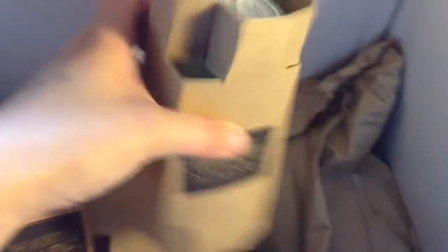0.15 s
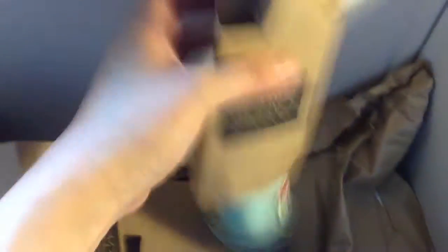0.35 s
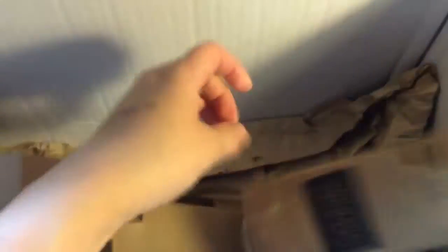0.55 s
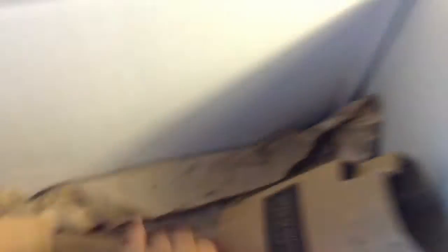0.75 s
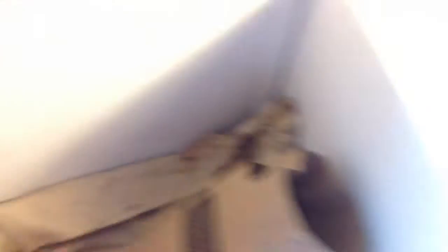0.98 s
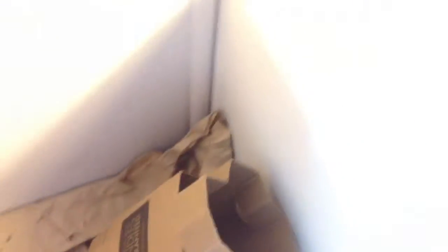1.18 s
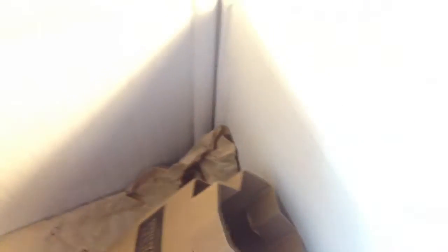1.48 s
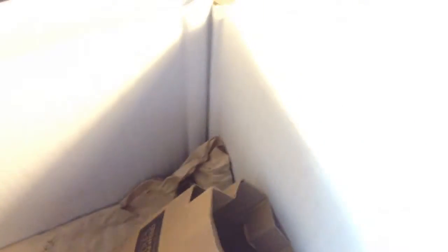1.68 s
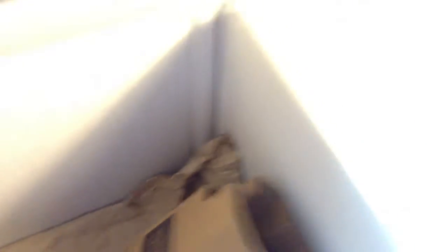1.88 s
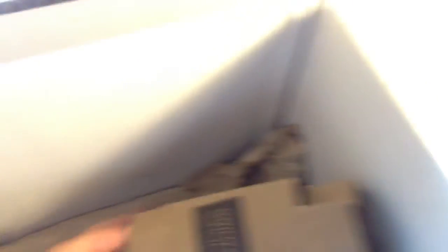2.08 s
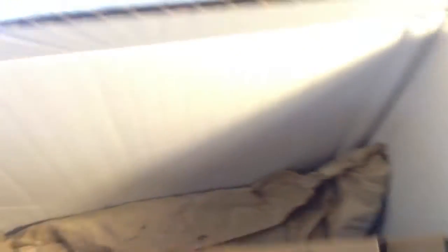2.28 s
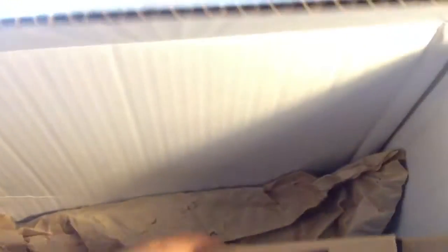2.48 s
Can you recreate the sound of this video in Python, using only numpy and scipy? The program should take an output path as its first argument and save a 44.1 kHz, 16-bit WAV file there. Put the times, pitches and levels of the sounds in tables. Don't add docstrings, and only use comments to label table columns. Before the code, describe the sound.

Paper crinkling up close inside an open cardboard box: cardboard sleeves clatter hard at first, then softer scrapes, small taps and wall thumps continue over faint hiss in a quiet room.

```python
import sys
import numpy as np
from scipy import signal
from scipy.fft import rfft, irfft, next_fast_len
from scipy.io import wavfile
from scipy.ndimage import uniform_filter1d, map_coordinates

SR = 44100
rng = np.random.default_rng(int(sys.argv[2]) if len(sys.argv) > 2 else 0)


def master_out(mix):
    frames = np.transpose(np.atleast_2d(mix))
    ceiling = np.clip(frames, -1, 1)
    pcm = np.round(ceiling * 32767).astype(np.int16)
    wavfile.write(sys.argv[1], SR, pcm)


def gain_from_db(level_db):
    decades = np.asarray(level_db, float) / 20
    return 10 ** decades


N = 116865


def unit(x):
    return x / np.sqrt(np.mean(x ** 2) + 1e-20)


def wobble(rate_hz):
    knots = rng.standard_normal(int(N * 400 / SR) + 4)
    return map_coordinates(knots, [np.arange(N) * rate_hz / SR])


def coloured(x, points):
    size = next_fast_len(len(x) + 8192)
    point_hz, point_db = np.transpose(points)
    bin_hz = np.fft.rfftfreq(size, 1 / SR)
    gain = gain_from_db(np.interp(np.log(bin_hz + 1), np.log(point_hz + 1), point_db))
    return irfft(rfft(x, size) * gain, size)[:len(x)]


def patchy(x, patchy_db):
    spectrum = signal.stft(x, nperseg=256)[2]
    field = rng.standard_normal(spectrum.shape)
    field = uniform_filter1d(field, 12, axis=0)
    field = uniform_filter1d(field, 12, axis=1)
    return signal.istft(spectrum * gain_from_db(patchy_db * unit(field)), nperseg=256)[1][:N]


def grains(per_s, spread_db):
    chance, size = rng.random((2, N))
    level = gain_from_db(-spread_db * np.log(size + 0.04))
    return (chance < per_s / SR) * level * rng.choice([-1, 1], N)


def add(track, start_s, sound):
    at = round(start_s * SR)
    track[at:at + len(sound)] += sound[:N - at]


def ring(hz, db, t60, attack_s, t, bend=1):
    hz = hz * np.exp(0.015 * rng.standard_normal(len(hz)))
    db = db + 1.2 * rng.standard_normal(len(hz))
    decay = gain_from_db(db[:, None] - 60 * (t / t60[:, None]) ** bend)
    modes = decay * np.sin(2 * np.pi * hz[:, None] * t)
    return (1 - np.exp(-t / attack_s)) * modes.sum(0)


def strokes(column, extra_db=0):
    # start_s, length_s, slide_db, crumple_db
    stroke_rows = [(-.03, .12, -43.5, -78), (0.133, 0.059, -45, -73), (0.212, 0.12, -29.5, -37.5),
                   (0.229, 0.1, -28.5, -33), (0.325, 0.042, -28, -21.5), (0.346, 0.12, -37, -24.5),
                   (0.455, 0.078, -35.5, -24), (0.526, 0.11, -31.5, -28), (0.689, 0.095, -31.5, -32),
                   (0.855, 0.077, -40, -42.5), (0.923, 0.14, -38.5, -40.5), (1.033, 0.14, -42.5, -48),
                   (1.179, 0.2, -32.5, -44), (1.315, 0.15, -30, -42.5), (1.507, 0.051, -38.5, -31),
                   (1.581, 0.11, -46, -43.5), (1.665, 0.21, -37.5, -49), (1.733, 0.12, -37, -34.5),
                   (1.841, 0.14, -33, -34.5), (1.938, 0.16, -36.5, -45), (2.014, 0.25, -44.5, -41),
                   (2.134, 0.11, -37, -51), (2.214, 0.13, -41, -39.5), (2.33, 0.061, -49, -35.5),
                   (2.445, 0.059, -40, -41.5), (2.483, 0.094, -42.5, -37), (2.571, 0.074, -46, -40),
                   (.625, 0.064, -42, -40), (0.753, 0.048, -34.5, -32)]
    rise_share, settle_s = 0.37, 0.082
    t, power = np.arange(N) / SR, np.zeros(N)
    for row, extra in zip(stroke_rows, np.zeros(len(stroke_rows)) + extra_db):
        corners_s = row[0] + row[1] * np.array([0, rise_share, 1])
        phase = np.interp(t, corners_s, [0, np.pi / 2, np.pi])
        power += (gain_from_db(row[column] + extra) * np.sin(phase)) ** 2
    keep = np.exp(-1 / (settle_s * SR))
    settling = signal.lfilter([1 - keep], [1, -keep], power)
    return np.sqrt(power + 0.048 * settling)


def room():
    # freq_hz, density_db
    air_colour = [(60, -3), (160, 12), (700, 1.5), (2400, -1), (8000, -3), (15300, 1)]
    level = gain_from_db(-48 + 0.57 * wobble(9.2))
    return level * unit(coloured(rng.standard_normal(N), air_colour))


def box_echo(x):
    t = np.arange(SR // 5) / SR
    tail = coloured(rng.standard_normal(len(t)), [(100, -5), (12000, -9.0)])
    tail = tail * gain_from_db(-60 * t / 0.12)
    delayed = np.pad(tail / np.linalg.norm(tail), (60, 0))
    return signal.fftconvolve(x, delayed)[:N]


def rumble():
    lean_db = [-6, -1, -12, -9, 0, -5, -4, -1.5, -8.5, -9, -2.5, -1, -1.5, -5, -2, 0, 1, 1.5, -2, -2, -5, 1,
               1, 2, -3, -6, -11, -5, -4]
    # freq_hz, density_db
    drone_colour = [(60, -4), (120, -0.5), (170, -1), (300, -4), (450, -15.5), (900, -47)]
    drone = coloured(rng.standard_normal(N), drone_colour)
    drone = unit(drone * gain_from_db(2.5 * wobble(40)))
    return strokes(column=3, extra_db=lean_db) * drone


def thumps():
    # start_s, peak_db, pitch_hz, t60_s
    thump_rows = [(0.35, -11, 160, 0.08), (.352, -8.5, 360, 0.066), (.384, -13, 346, 0.066),
                  (0.394, -24, 180, 0.14), (0.423, -20.5, 320, 0.076), (0.4953, 3, 178.6, 0.04),
                  (.509, -12, 189, 0.056), (0.518, -7.5, 260, 0.038), (0.577, -5, 225, 0.045),
                  (0.763, -39, 200, 0.32), (1.252, -29, 299, 0.066), (1.399, -20.5, 221, 0.083),
                  (1.416, -16, 241, 0.054), (1.445, -30, 198, 0.18), (1.556, -27, 207, .06),
                  (1.491, -4.5, 266, 0.034), (1.493, -10, 160, 0.061), (1.495, -12.5, 307.5, 0.063),
                  (1.507, -23, 312, 0.047), (1.526, -30, 284.7, 0.24), (1.602, -23, 270, 0.058),
                  (1.646, -27, 188, 0.082), (1.784, -17, 267, 0.038), (1.762, -27, 220, 0.049),
                  (1.817, -19.5, 194, 0.07), (1.867, -23, 251, 0.035), (2.05, -33.5, 209, 0.082),
                  (2.098, -22.5, 177, 0.052), (2.125, -28, 161, 0.13), (2.191, -25.5, 162.7, 0.32),
                  (2.272, -9.5, 214, 0.041), (2.343, -14, 255, 0.032), (2.381, -30, 184, 0.12),
                  (2.45, -32.5, 171, 0.17), (2.507, -32.5, 214, 0.21), (2.541, -47, 194, 0.098)]
    # pitch_ratio, level_db, t60_ratio
    wall_modes = [(1, 4, 0.72), (1.5, -5, 0.76), (2.3, -12, 0.68)]
    out, t = np.zeros(N), np.arange(SR // 3) / SR
    ratio, level, life = np.transpose(wall_modes)
    for start_s, db, hz, t60 in thump_rows:
        sound = ring(hz * ratio, db - 3.0 + level, t60 * life * 1.05, attack_s=0.0018, t=t, bend=1.053)
        add(out, start_s, sound)
    return out


def knocks():
    # start_s, peak_db, pitch_hz
    knock_rows = [(.239, -18.5, 1230), (.2473, -18, 1900), (0.269, -11, 1495), (0.285, -10, 1696),
                  (0.2975, -1, 684), (.311, -18, 690), (0.343, -4.5, 751), (0.35, -10.5, 564),
                  (0.395, -12, 834), (0.4175, -19, 820), (0.474, -12, 800), (0.486, -11.5, 860),
                  (0.492, -6, 698), (0.5476, -8.5, 1310), (0.556, -10.5, 904), (0.571, -13.5, 1234),
                  (0.596, -12.5, 1250), (0.609, -10.5, 1150), (0.68, -20, 1300), (.699, -18, 800),
                  (0.711, -16.5, 808), (.727, -15.5, 794), (0.764, -13, 1053), (.989, -19, 990),
                  (1.238, -25.5, 950), (1.255, -17.5, 980), (1.401, -20, 830), (1.414, -16.5, 950),
                  (1.519, -18.5, 1165), (1.659, -22, 916), (1.758, -26, 890), (1.782, -23, 1180),
                  (1.8115, -21.5, 964), (1.865, -26, 1020), (1.884, -21.5, 780), (1.896, -23, 715),
                  (1.91, -21.5, 1510), (1.92, -26, 824), (2.008, -23, 1950), (2.043, -14.5, 813),
                  (2.096, -19, 956), (2.122, -15.5, 915), (2.352, -23, 1350), (2.3712, -12, 596),
                  (2.374, -14, 923), (2.381, -23, 930), (2.464, -40, 1040), (2.478, -27, 1350),
                  (2.508, -21, 794), (2.578, -20.5, 950)]
    # pitch_ratio, level_db, t60_s
    sleeve_modes = [(0.997, 2, 0.041), (0.883, 1.5, 0.017), (1.372, -5, 0.028), (1.9, -7, 0.028),
                    (2.5, -14.5, 0.033)]
    out, t = np.zeros(N), np.arange(SR // 8) / SR
    ratio, level, t60 = np.transpose(sleeve_modes)
    for start_s, db, hz in knock_rows:
        life = t60 * gain_from_db(0.34 * db) * 1.31
        add(out, start_s, ring(hz * ratio, db - 8.0 + level, life, attack_s=0.00079, t=t))
    return out * gain_from_db(1.5 * wobble(400))


def snaps():
    # start_s, peak_db, pitch_hz, sizzle_over_peak_db
    snap_rows = [(0.2867, -10.5, 2820, -18), (0.2986, -15, 5700, 0.5), (0.338, -5.5, 2390, -5.5),
                 (0.3423, -18, 4700, -5), (0.354, -13, 2200, -16), (.389, -21, 3030, -12),
                 (0.3434, -11.5, 2350, -4), (0.418, -13, 2380, -11), (0.4746, -15, 2090, -28),
                 (0.488, -14.5, 2350, -22), (.496, -20.5, 3000, -4), (0.509, -22, 4080, 1.5),
                 (.558, -21, 2360, -26), (0.549, -16.5, 2470, -13), (0.574, -15, 2510, -11),
                 (0.6012, -21, 3400, -13), (0.609, -14, 2450, -23), (0.6284, -24.5, 2040, -6),
                 (0.6786, -22, 2420, -24), (0.711, -16.5, 3830, -35), (0.8494, -32, 2050, -25),
                 (0.7658, -19.5, 2570, -12), (0.977, -17.5, 2840, -50), (0.9888, -23.5, 2330, -25),
                 (1.4916, -22, 3080, -8), (1.5196, -24, 2090, -8), (1.6592, -12, 2075, -10.5),
                 (1.7512, -30, 5900, 4), (1.8009, -24, 1780, -18), (1.8132, -20, 2700, -14),
                 (1.887, -26, 3020, -24), (2.0425, -28.5, 2270, -20), (2.094, -32, 2260, -10),
                 (2.121, -31, 1800, -18), (2.3714, -16.5, 1920, -6.5), (2.512, -26, 2350, -4.5),
                 (2.579, -30, 1950, -7)]
    # freq_hz, density_db
    crack_colour = [(700, -2.5), (1500, -1), (5500, -4), (9000, -31)]
    sizzle_colour = [(4000, -25), (8000, -4.5), (16000, -7.5)]
    t60_s, ring_db, crack_db = 0.015, -2.5, -5
    ratio = np.array([1, 1.25, 1.7, 2.3])
    rings, cracks, sizzles = np.zeros((3, N))
    t = np.arange(SR // 16) / SR
    noise = rng.standard_normal(N)
    for start_s, db, hz, sizzle_db in snap_rows:
        mode_db = db + ring_db - 7.1 * np.arange(4)
        add(rings, start_s, ring(hz * ratio, mode_db, np.full(4, t60_s), attack_s=0.00077, t=t))
        crack_decay = gain_from_db(db + crack_db - 60 * (t / t60_s) ** 1.245)
        add(cracks, start_s, (1 - np.exp(-t / 0.00072)) * crack_decay)
        add(sizzles, start_s, gain_from_db(db + sizzle_db - 4 - 60 * (t / (0.73 * t60_s)) ** 2.0))
    crack = cracks * unit(coloured(noise, crack_colour))
    sizzle = sizzles * unit(coloured(noise, sizzle_colour))
    return rings + crack + sizzle


def crackle():
    when, pitch, size = rng.random((3, 900))[:, :, None]
    hz, t = 600 * 9 ** pitch, np.arange(SR // 100) / SR
    level = (size + 0.13) ** -0.7 * (hz / 600) ** -0.2
    pops = level * np.sin(2 * np.pi * hz * t) * np.exp(-hz * t / 2.1)
    at = (when * N).astype(int) + np.arange(len(t))
    creases = np.bincount(at.ravel(), pops.ravel(), N)[:N]
    return gain_from_db(-11) * strokes(column=3) * unit(creases)


def crumple():
    # freq_hz, density_db
    buckle_colour = [(150, -16), (380, -1.5), (550, -9), (850, -4), (1600, -14), (4000, -20), (10000, -28)]
    buckles = 1.1 * rng.standard_normal(N) + unit(grains(per_s=900, spread_db=3.5))
    body = patchy(coloured(buckles, buckle_colour), patchy_db=2.5)
    return strokes(column=3) * unit(body * gain_from_db(2.5 * wobble(90)))


def slide():
    # freq_hz, density_db
    hiss_colour = [(290, -53), (500, -22), (675, -6), (1510, -9.5), (2310, -4), (6210, -9), (15300, -6.5)]
    grit = rng.standard_normal(N) + 0.32 * unit(grains(per_s=2500, spread_db=8.5))
    hiss = patchy(coloured(grit, hiss_colour), patchy_db=2.6)
    return strokes(column=2) * unit(hiss * gain_from_db(1.6 * wobble(60)))


def scene():
    paper = slide() + crumple() + crackle()
    hits = snaps() + knocks() + thumps()
    echo = gain_from_db(-11) * box_echo(hits)
    return (room() + echo + rumble() + hits + paper)[None]


def low_pass(x):
    return signal.sosfilt(signal.butter(12, 16480, fs=SR, output="sos"), x)


def record(dry):
    top_hz, ceiling = 15450, 0.74
    roll_off = signal.butter(4, 118, "high", fs=SR, output="sos")
    x = signal.sosfilt(roll_off, dry) + gain_from_db(-27) * dry
    x = x / (1 + np.abs(x / ceiling) ** 6) ** (1 / 6)
    x = coloured(x[0], [(top_hz, 0), (top_hz + 120, -33), (16470, -36), (16500, -90)])[None]
    return low_pass(x)


dry = scene()
out = record(dry)
master_out(out)
```